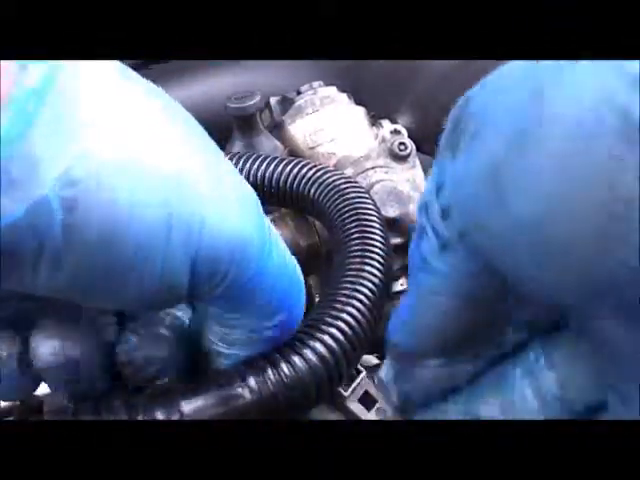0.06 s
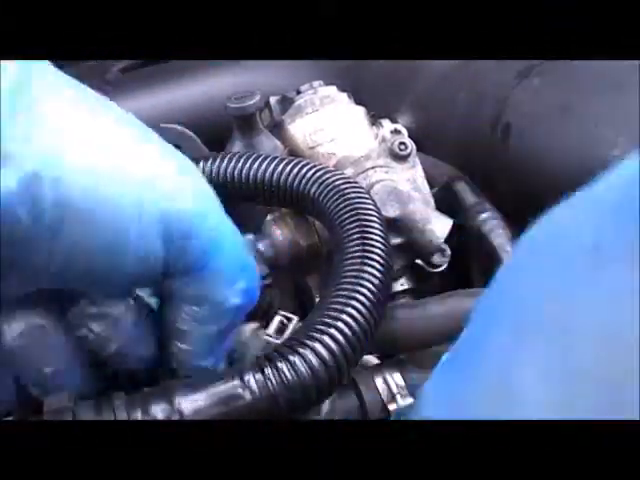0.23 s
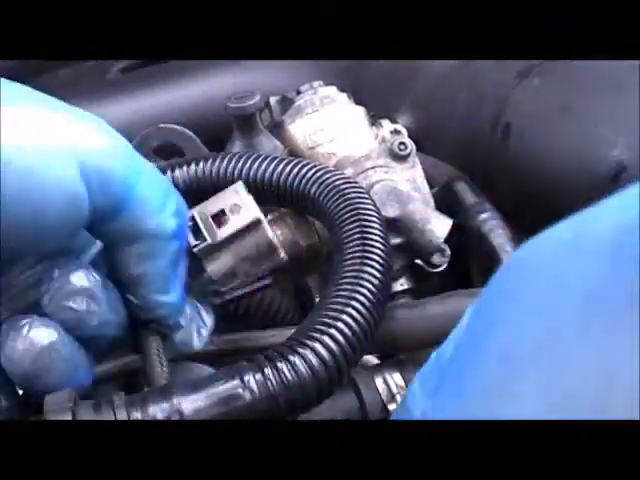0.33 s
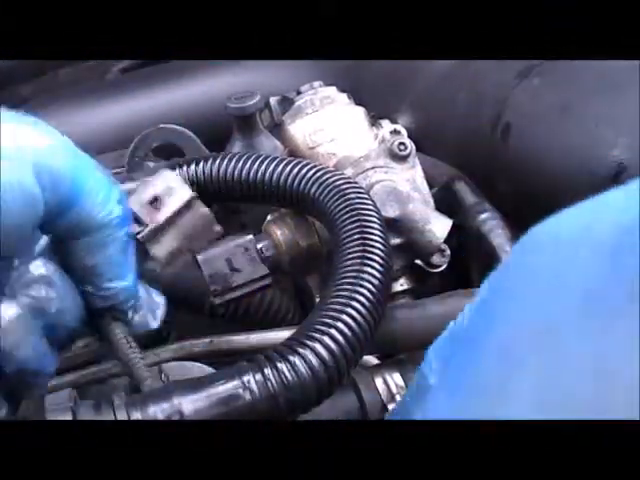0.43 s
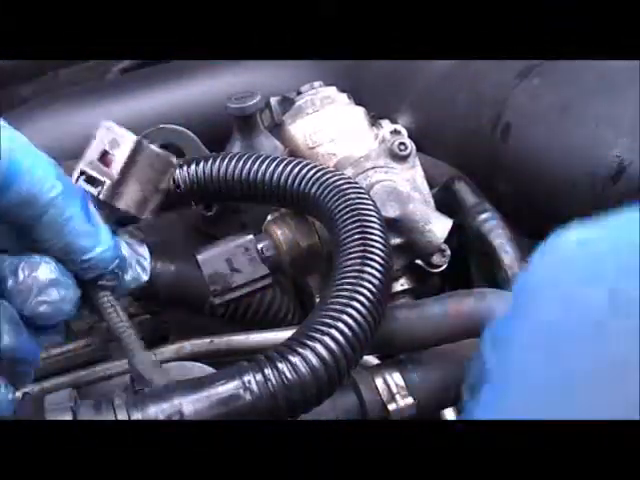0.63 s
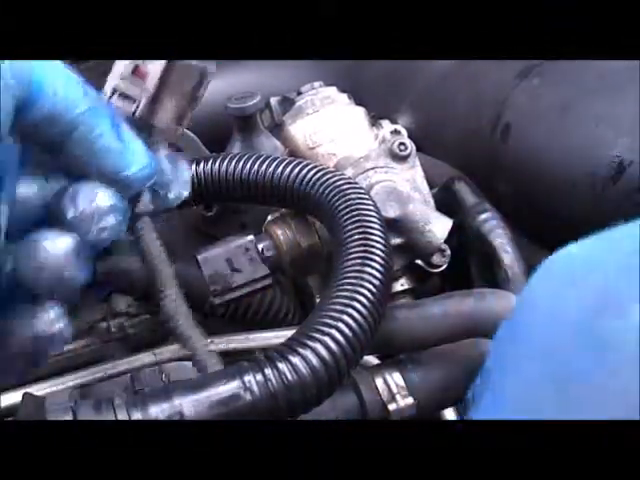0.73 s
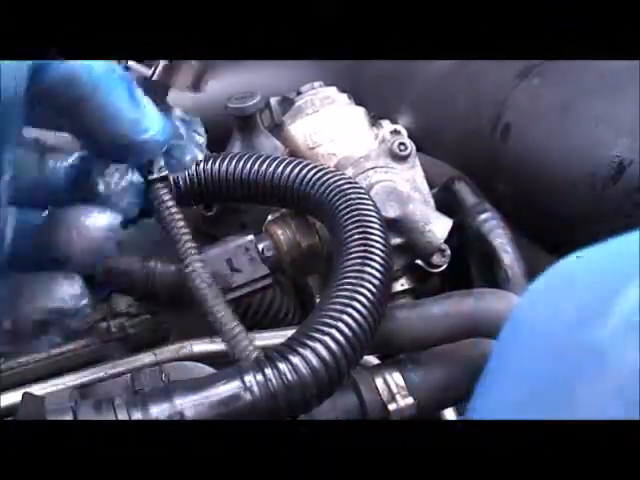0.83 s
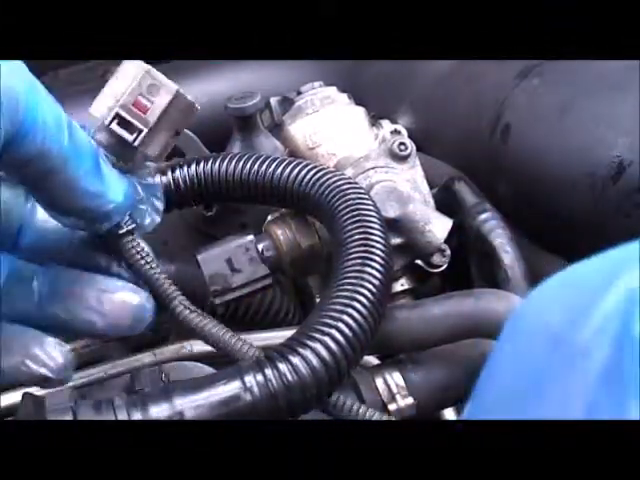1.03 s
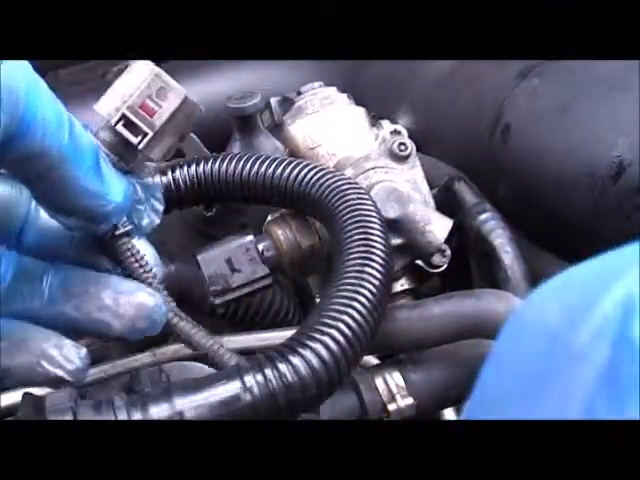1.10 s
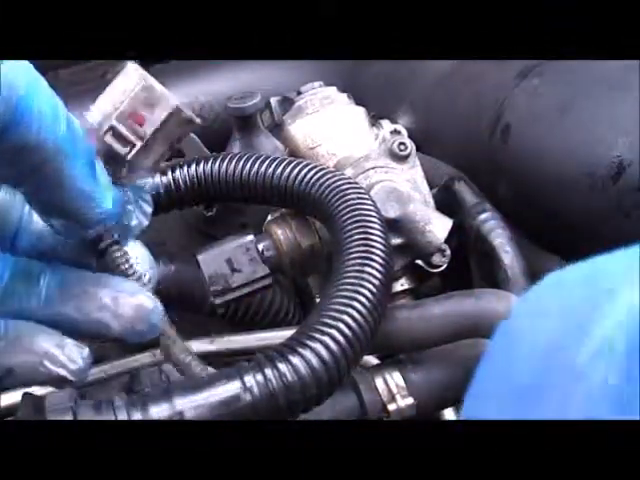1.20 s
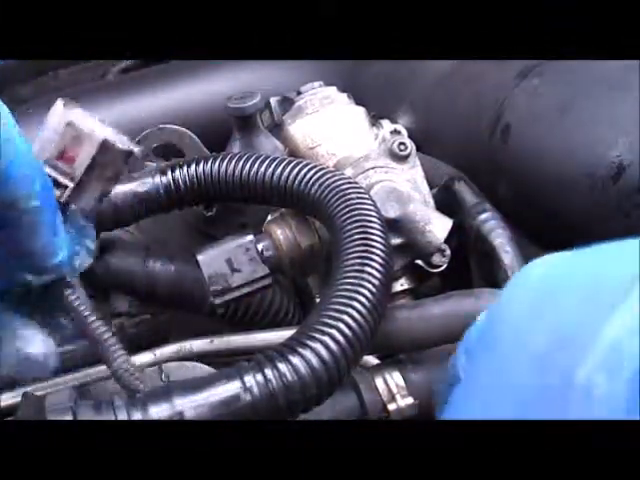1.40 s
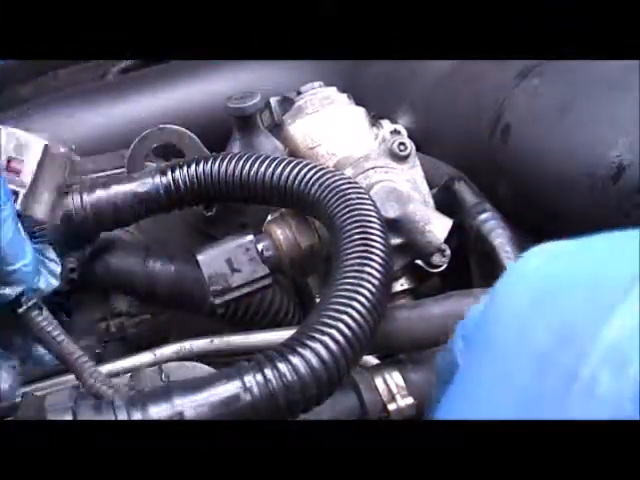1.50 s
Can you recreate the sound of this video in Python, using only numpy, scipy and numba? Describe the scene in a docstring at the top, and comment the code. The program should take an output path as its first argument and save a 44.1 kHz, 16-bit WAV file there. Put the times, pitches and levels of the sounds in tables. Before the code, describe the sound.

Gloved hands rustle close up on an engine. A plastic connector comes loose with one sharp knock, and the gloves go on crinkling, with a few crisp clicks and soft cable scrapes, over quiet workshop hiss.

```python
"""Over soft workshop hiss, a plastic connector scrapes and gloves rub, close up in an engine bay.
Stick-slip friction drives both; taut creases in the glove film snap through.
At 0.22 s the connector pulls free in a rattling knock: contacts thud, ring its modes and scuff.
Gain control ducks the hiss after the knock; rubs, snaps and scrapes go on."""
import sys
import numpy as np
from scipy import signal
from scipy.fft import rfft, irfft
from scipy.io import wavfile
from numba import njit

SR = 44100
rng = np.random.default_rng(int(sys.argv[2]) if len(sys.argv) > 2 else 0)


def persist_wave(psi):
    """Save psi, clipped to +-1, as 16-bit WAV."""
    counts = np.round(np.clip(psi, -1, 1) * 32767).astype(np.int16)
    wavfile.write(sys.argv[1], SR, np.atleast_2d(counts).T)


N = 68355

# workshop hiss spectrum: freq_hz, gain_db
HISS_SPECTRUM = [(25, -18), (55, -32), (90, -13.5), (130, -15.5), (200, -9), (330, -8), (500, -3),
                 (700, -3.5), (880, 3), (1000, -2), (1240, 3), (1420, -2), (1650, -2.5), (2300, -9.5),
                 (4000, -13.5), (8000, -11), (16000, -36)]
# hiss level curve: time_s, level_db
HISS_LEVELS = [(0, -48), (.4, -51), (.8, -47.5), (1.15, -49), (1.4, -49.5), (1.55, -46)]
# stereo side spectrum: freq_hz, gain_db
SIDE_SPECTRUM = [(60, -7.5), (300, -7), (1300, -11.5), (4400, -14), (7000, -11), (9000, -0.5),
                 (15000, -8.5)]
# connector and cable drags: start_s, length_s, level_db, pitch_hz, resonance_re_drag_db
DRAG_STROKES = [(.007, .026, -40, 3130, 10), (.007, 0.036, -41.5, 1375, -1.5), (.1, 0.026, -49.5, 890, 0),
                (0.213, .008, -37.5, 1300, -26), (0.247, 0.047, -44.5, 2700, -3),
                (0.289, 0.0048, -45, 2520, 6), (0.315, 0.039, -46, 1390, 0), (0.728, 0.016, -39.5, 1050, 7),
                (0.73, 0.024, -45.5, 360, 2), (0.824, 0.069, -49, 1260, -2), (1.264, 0.015, -50, 1130, 15),
                (1.377, 0.0084, -44.5, 913, -1.5)]
# connector and loom modes: freq_hz, level_db, t60_s
BODY_MODES = [(494, -23.5, 0.062), (569, -11, 0.063), (830, 3, 0.051), (1063, -4.5, 0.053),
              (1198, 0.5, 0.055), (1313, 2, 0.064), (1372, -4, 0.09), (1533, 0, 0.052), (1647, 1, 0.052),
              (2034, 0, .045), (2150, -5, 0.059), (2380, 4, .045), (2420, -2, 0.084), (2646, -5, 0.041)]
# contact thud spectrum: freq_hz, gain_db
THUD_SPECTRUM = [(30, -39.5), (150, -26.5), (350, -19.5), (550, -12.5), (830, 1), (1150, 0.5), (1500, 0.5),
                 (2000, -8), (2700, -3.5), (4000, -18), (8000, -39), (16000, -62)]
# glove rubs: start_s, length_s, level_db, squeak_hz, squeak_re_rub_db, lowpass_hz
RUB_STROKES = [(.008, 0.033, -38, 4460, -13, 8600), (0.052, 0.081, -53, 3860, -16, 9900),
               (0.129, 0.076, -43.5, 6600, -7.5, 13300), (0.211, .01, -26.5, 6200, -25, 9000),
               (0.252, 0.06, -44, 3960, -11, 8400), (0.321, 0.037, -42, 6560, -9, 9500),
               (0.364, 0.072, -45.5, 7050, -11, 9900), (0.43, 0.078, -43, 3710, -3.5, 10000),
               (0.478, 0.029, -37.5, 3740, -2, 10400), (0.509, 0.041, -32.5, 3570, -17, 10900),
               (0.555, 0.018, -31, 6330, -0.5, 11200), (0.621, 0.082, -48.5, 4040, -14, 10900),
               (0.662, 0.039, -35, 4090, -9, 11100), (0.727, 0.032, -45.5, 3640, -23, 11700),
               (0.782, 0.065, -54.5, 4200, -26, 11200), (0.817, 0.046, -44.5, 4420, -17, 13000),
               (0.866, 0.072, -55, 6800, -18, 11000), (0.926, .045, -42.5, 6360, -3, 11900),
               (0.99, 0.038, -55.5, 6600, -16, 9900), (1.031, 0.046, -47, 6800, -32, 11100),
               (1.073, 0.02, -56.5, 6440, -22, 10000), (1.188, 0.034, -56, 6650, -19, 10900),
               (1.224, 0.044, -45, 4000, -41, 14200), (1.28, 0.031, -56, 7500, 2, 11000),
               (1.311, 0.06, -45.5, 7660, -27, 13000), (1.329, .022, -46.5, 3740, 1, 12300),
               (1.396, 0.023, -46.5, 4280, -27, 13000), (1.42, 0.1, -55.5, 7760, -4, 10600),
               (1.532, 0.022, -40.5, 6000, -25, 8800)]
# glove film spectrum: freq_hz, gain_db
FILM_SPECTRUM = [(100, -51), (600, -16), (1200, -11.5), (2500, -7), (4000, -2), (5000, -3), (7000, 1.5),
                 (8500, -1.5), (10800, -7.5), (12200, -13.5), (16000, -14.5)]
# crease snaps: start_s, level_db, pitch_hz, tail_db, highpass_hz, lowpass_hz
CREASE_SNAPS = [(0.0866, -40, 7900, -1, 3500, 11800), (0.3763, -46, 6860, -5, 3000, 10000),
                (0.3913, -34.5, 6940, -8, 4440, 11800), (0.5385, -15.5, 6200, -3.5, 3130, 6950),
                (0.665, -20.5, 7000, -7, 4670, 12800), (0.9481, -18.5, 6550, -6, 2580, 14700),
                (0.9523, -20, 8600, 8, 3530, 11800), (.955, -21, 7650, -15, 3500, 11100),
                (.9699, -17.5, 6900, -1, 1500, 10000)]
# snap spectrum: freq_hz, gain_db
SNAP_SPECTRUM = [(100, -38), (1000, -27), (1900, -11), (2700, -5), (4200, -5), (6000, 0), (8200, 1.5),
                 (10200, -3.5), (12000, -3.5), (16000, -8)]
# connector contacts: start_s, body_db, body_lowpass_hz, scuff_db, scuff_lowpass_hz
CONTACTS = [(0.219, -23.5, 990, -33, 6500), (.2211, -6.5, 1780, -18, 13100),
            (.2231, -27, 2940, -13.5, 9200), (0.2264, -17, 3020, -25, 8400), (.233, -21.5, 3030, -16, 8300),
            (.2352, -25, 3000, -20.5, 9500), (0.2367, -55, 3480, -13, 8200),
            (0.2421, -25, 3500, -17.5, 7800), (0.246, -29, 1700, -22.5, 7800),
            (0.2506, -30, 2500, -26, 11800)]
# plastic-on-plastic scuff spectrum: freq_hz, gain_db
SCUFF_SPECTRUM = [(200, -31.5), (1500, -8.5), (2800, -3.5), (4200, -15), (5800, -5.5), (7300, 3),
                  (8300, -7.5), (10500, -11.5), (12500, -14.5), (16000, -18)]


def undb(db):
    """Decibels to gain."""
    return 10 ** (np.asarray(db) / 20)


def time_s():
    """Time of every sample."""
    return np.arange(N) / SR


def unit_rms(x):
    """Scale to rms 1."""
    return x / np.sqrt(np.mean(x ** 2) + 1e-20)


def burst(x):
    """Scale to the energy of 5 ms at rms 1."""
    return unit_rms(x) * np.sqrt(.005 * SR / N)


def colour(x, spectrum):
    """Minimum-phase filter through (hz, db) points."""
    hz, db = np.array(spectrum, float).T
    grid_hz = np.maximum(np.fft.rfftfreq(2 * N, 1 / SR), 1)
    gain = undb(np.interp(np.log(grid_hz), np.log(hz), db))
    cepstrum = irfft(np.log(gain))
    cepstrum[1:N] *= 2
    cepstrum[N + 1:] = 0
    return irfft(rfft(x, 2 * N) * np.exp(rfft(cepstrum)))[..., :N]


def rolloff(x, hz, kind="low"):
    """Second-order low-pass or high-pass."""
    return signal.sosfilt(signal.butter(2, hz, kind, fs=SR, output="sos"), x + 1e-18)


def resonate(x, hz, width_hz):
    """One resonance, gain 1 at centre."""
    return signal.lfilter(*signal.iirpeak(hz, hz / width_hz, fs=SR), x)


def wander(rate_hz):
    """Random curve, deviation near 1."""
    knots_s = np.arange(0, N / SR + 1, 1 / rate_hz)
    return np.interp(time_s(), knots_s, rng.standard_normal(N)[:len(knots_s)])


def pan(x, left_db):
    """Lean left by a level difference."""
    return x * undb(np.array([[left_db], [-left_db]]) / 2)


def stereo(mid, side):
    """Two microphone ports, differing most in the treble."""
    return mid + np.array([[1], [-1]]) * colour(side, SIDE_SPECTRUM)


def fading_noise(decay_s):
    """Scattered reflections dying away."""
    return burst(rng.standard_normal(N) * np.exp(-time_s() / decay_s))


def add_at(out, x, start_s):
    """Mix x in from start_s."""
    i = int(start_s * SR)
    out[..., i:] += x[..., :N - i]


def stroke(start_s, length_s, attack_s, release_s):
    """Movement envelope: rise, hold, decay."""
    t = time_s() - start_s
    return np.clip(t / attack_s, 0, 1) * np.exp(-np.maximum(t - length_s, 0) / release_s)


def slips(rate_hz, scatter_db):
    """Dense stick-slip impulses of unequal size."""
    impulses = (rng.random(N) < rate_hz / SR) * rng.choice([-1, 1], N)
    size_db = scatter_db * np.minimum(rng.exponential(size=N), 6)
    return unit_rms(impulses * undb(size_db))


def workshop_hiss():
    """Mid-range room noise; the level drifts and flickers."""
    air = unit_rms(colour(stereo(*rng.standard_normal((2, N))), HISS_SPECTRUM))
    level_db = np.interp(time_s(), *np.array(HISS_LEVELS).T) + 2.1 * wander(rate_hz=25.42)
    return pan(air * undb(level_db), left_db=3.5)


def body_ring(rise_s=0.0029):
    """Connector and loom modes swell briefly, then fade."""
    t = time_s()[:N // 4]
    modes = sum(undb(db - 60 * t / t60_s) * np.sin(2 * np.pi * hz * t) for hz, db, t60_s in BODY_MODES)
    return burst(np.pad(modes * np.minimum(t / rise_s, 1), (0, N - len(t))))


def connector_drags():
    """Connector and cable scrape over hoses; friction excites the body modes."""
    friction = stereo(slips(rate_hz=2900, scatter_db=1.16), slips(rate_hz=6000, scatter_db=3))
    scrape = unit_rms(colour(friction, THUD_SPECTRUM))
    ringing = unit_rms(signal.fftconvolve(friction, body_ring()[None], axes=1)[:, :N])
    body = unit_rms(scrape + undb(-3.5) * ringing)
    out = np.zeros((2, N))
    for start_s, length_s, db, hz, resonance_db in DRAG_STROKES:
        resonance = unit_rms(resonate(body, hz, width_hz=hz * 0.099))
        drag = unit_rms(body + undb(resonance_db) * resonance)
        out += undb(db) * stroke(start_s, length_s, attack_s=0.0017, release_s=0.0072) * drag
    return pan(out, left_db=2.0)


def glove_rubs(rest_db=-64, flicker_db=1.5, squeak_width_hz=740):
    """Glove film slides and crinkles; each stroke has its own brightness and squeak."""
    mid, side = (colour(slips(rate_hz=9000, scatter_db=1.35), FILM_SPECTRUM) for _ in range(2))
    crinkle = unit_rms(stereo(mid, side))
    out = undb(rest_db) * unit_rms(rolloff(crinkle, hz=7500))
    for start_s, length_s, db, squeak_hz, squeak_db, lowpass_hz in RUB_STROKES:
        band = resonate(crinkle, squeak_hz, squeak_width_hz)
        squeak = unit_rms(resonate(band, squeak_hz, squeak_width_hz))
        slide = unit_rms(rolloff(crinkle, lowpass_hz))
        rub = unit_rms(slide + undb(squeak_db) * squeak)
        out += undb(db) * stroke(start_s, length_s, attack_s=0.01, release_s=0.008) * rub
    return pan(out * undb(flicker_db * wander(rate_hz=150)), left_db=0.5)


def glove_snaps(flutter_db=1.5, flutter_s=0.0005, tail_s=0.0037, ring_db=3):
    """Taut creases snap through: impulse, brief flutter, engine-bay reflections."""
    impulse = burst(signal.unit_impulse(N))
    out = np.zeros((2, N))
    for start_s, db, hz, tail_db, highpass_hz, lowpass_hz in CREASE_SNAPS:
        mid, side = (undb(flutter_db) * fading_noise(flutter_s) + undb(tail_db) * fading_noise(tail_s)
                     for _ in range(2))
        tick = colour(stereo(mid + impulse, side), SNAP_SPECTRUM)
        tick = rolloff(rolloff(tick, lowpass_hz), highpass_hz, "high")
        snap = burst(tick + undb(ring_db) * resonate(tick, hz, width_hz=2000))
        add_at(out, undb(db) * snap, start_s)
    return pan(out, left_db=0.2)


def plastic_scuff(start_s, lowpass_hz):
    """Plastic catches on plastic: a millisecond swell of tiny slips, then a weak tail."""
    lag_s, rise_s, fall_s, tail_s, tail_db = 0.00045, 0.00073, 0.0009, 0.0084, -16
    t = time_s() - start_s - lag_s
    after_s = np.maximum(t, 0)
    rise = np.exp(np.minimum(t, 0) / rise_s)
    fall = np.exp(-after_s / fall_s) + undb(tail_db) * np.exp(-after_s / tail_s)
    friction = stereo(*(rise * fall * rng.choice([-1, 1], (2, N))))
    return burst(rolloff(colour(friction, SCUFF_SPECTRUM), lowpass_hz))


def connector_rattle(thud_s=0.0016, side_db=-6, modes_db=0.5, grip_s=0.2525, grip_decay_s=0.0084):
    """Connector lets go: each contact thuds, rings and scuffs; the closing hand damps the body."""
    body, scuffs = np.zeros((2, 2, N))
    modes = undb(modes_db) * body_ring()
    for start_s, body_db, body_lowpass_hz, scuff_db, scuff_lowpass_hz in CONTACTS:
        impact = stereo(fading_noise(thud_s), undb(side_db) * fading_noise(thud_s))
        thud = burst(colour(impact, THUD_SPECTRUM))
        knock = burst(rolloff(thud + modes, body_lowpass_hz))
        add_at(body, undb(body_db) * knock, start_s)
        scuffs += undb(scuff_db) * plastic_scuff(start_s, scuff_lowpass_hz)
    grip = np.exp(-np.maximum(time_s() - grip_s, 0) / grip_decay_s)
    return pan(body * grip, left_db=4.5) + pan(scuffs, left_db=1.0)


def scene(room_t60_s=0.16, room_db=-23):
    """Close gloves and connector, faint room tail, hiss."""
    near = glove_rubs() + glove_snaps() + connector_rattle() + connector_drags()
    decay = undb(-60 * time_s() / room_t60_s)
    room_response = unit_rms(rng.standard_normal((2, N)) * decay) / np.sqrt(N)
    reverb = signal.fftconvolve(near, room_response, axes=1)[:, :N]
    return near + undb(room_db) * reverb + workshop_hiss()


@njit
def follow(x, attack_s, release_s):
    """Envelope follower, separate rise and fall."""
    out, level = np.empty(len(x)), 0.
    for i in range(len(x)):
        level += (x[i] - level) / (SR * (attack_s if x[i] > level else release_s))
        out[i] = level
    return out


def record(dry):
    """Gain control ducks after loud sounds; then full-scale clip and steep low-pass."""
    threshold_db, ratio, lowpass_hz = -29, 1.39, 16000
    envelope = follow(np.abs(dry).max(axis=0), attack_s=0.021, release_s=0.42)
    gain = np.minimum(undb(threshold_db) / (envelope + 1e-9), 1) ** (1 - 1 / ratio)
    lowpass = signal.ellip(8, .2, 70, lowpass_hz, fs=SR, output="sos")
    return signal.sosfilt(lowpass, np.clip(dry * gain, -1, 1))


dry = scene()
out = record(dry)
persist_wave(out)
```